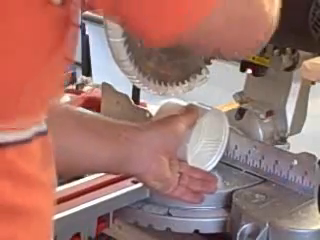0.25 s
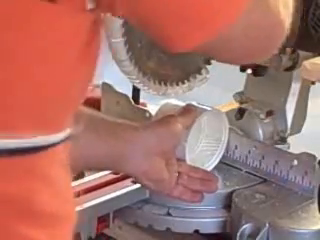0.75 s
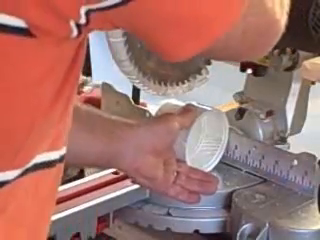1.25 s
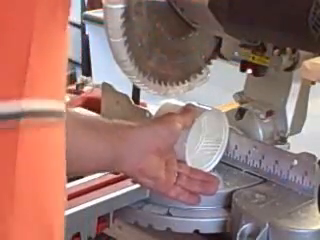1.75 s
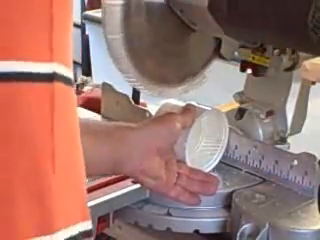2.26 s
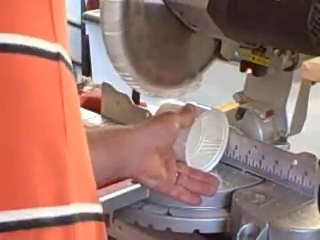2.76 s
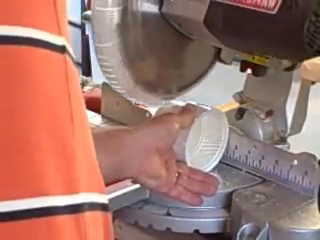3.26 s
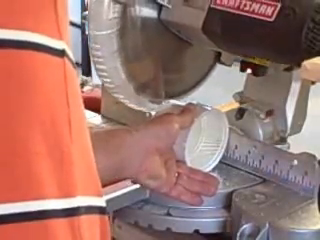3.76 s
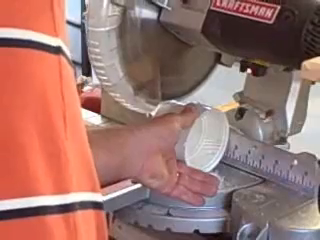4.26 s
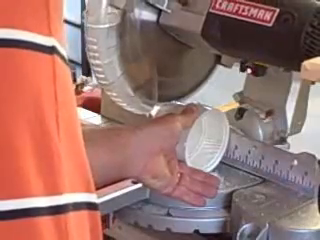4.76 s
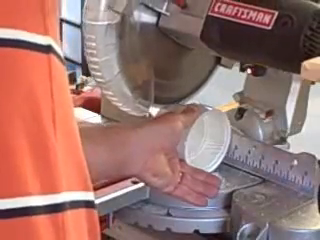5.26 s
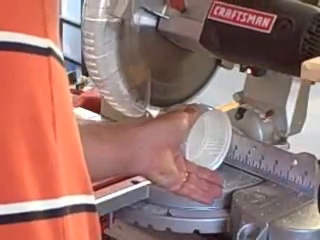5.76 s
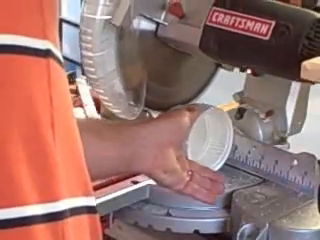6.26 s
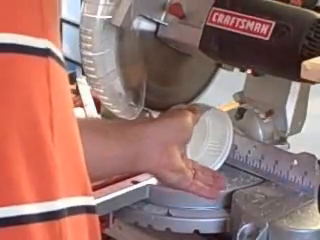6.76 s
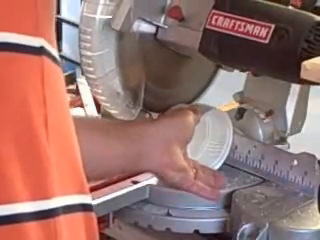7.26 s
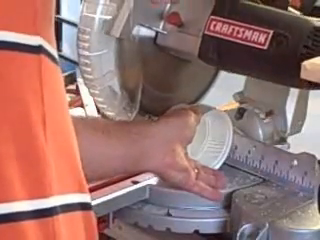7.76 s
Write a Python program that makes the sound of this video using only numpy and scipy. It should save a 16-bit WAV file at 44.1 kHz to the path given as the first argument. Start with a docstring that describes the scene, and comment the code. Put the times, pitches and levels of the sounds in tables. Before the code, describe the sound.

In a quiet workshop a miter saw jerks on, whines up to a roar, then bites plastic pipe with a harsh, ringing screech that keeps going.

```python
"""A mitre saw in a quiet workshop: its motor jerks into life, whines up to speed and bites a plastic pipe.
Motor and cut are random noise, partly repeated every turn of the blade, then coloured and set in level.
Gear and tooth tones are sines locked to the blade angle; the start and first contact are ringing sines.
A sleeve rubs past beforehand. Room hiss and mains hum lie underneath."""
import sys
import numpy as np
from scipy import signal
from scipy.fft import rfft, irfft, next_fast_len
from scipy.io import wavfile
from scipy.ndimage import uniform_filter1d, map_coordinates

SR = 44100
rng = np.random.default_rng(int(sys.argv[2]) if len(sys.argv) > 2 else 0)


def file_out(sig):
    """Save sig as 16-bit WAV at sys.argv[1]."""
    # one column per channel
    cols = np.atleast_2d(sig).T
    # limit, then scale
    lim = np.clip(cols, -1, 1)
    pcm = np.round(lim * 32767).astype(np.int16)
    wavfile.write(sys.argv[1], SR, pcm)


N = 353682  # length in samples

# how fast the blade turns: (time [s], speed [turns/s])
BLADE_SPEED = [(2.05, 10.0), (2.11, 21.0), (2.18, 30.3), (2.3, 43.0), (2.38, 49.6), (2.5, 55.3),
               (2.7, 61.81), (3.0, 67.3), (3.3, 71.22), (3.8, 74.62), (4.1, 74.98), (4.4, 74.4),
               (5.1, 71.04), (5.55, 67.65), (5.8, 66.7), (6.6, 64.6), (7.6, 61.9), (8.02, 60.09)]
# loudness of the motor: (time [s], housing roar [dB], gearbox rattle [dB], cooling air [dB])
MOTOR_LEVELS = [(2.04, -84, -81, -74), (2.05, -35, -31, -42), (2.11, -27.5, -26.5, -31),
                (2.2, -24.5, -26, -34), (2.45, -23, -23.5, -25.5), (2.89, -20, -17.5, -24.5),
                (3.57, -22, -19, -24.5), (3.79, -20.5, -19, -23.5), (3.92, -25, -21.5, -24.5),
                (4.64, -25.5, -23.5, -24), (5.25, -29, -23.5, -21.5), (5.4, -35.5, -27.5, -22.5),
                (5.6, -33.5, -30, -30.5), (6.2, -36, -30.5, -26), (6.62, -36.5, -35.5, -31.5),
                (6.92, -32, -29, -29), (7.2, -33, -28, -21.5), (7.6, -32.5, -30, -23),
                (8.02, -35.5, -29, -27.5)]
# bite of the blade: (time [s], level [dB])
CUT_LEVEL = [(3.77, -23), (3.81, -20), (3.95, -23.5), (4.33, -19), (4.59, -20.5), (4.65, -23), (5.19, -20),
             (5.4, -21), (5.6, -22), (5.68, -19.5), (6.16, -24), (6.45, -24), (6.56, -32.5), (6.87, -23),
             (7.37, -20), (7.65, -21.5), (7.81, -20), (8.02, -20.5)]
# ways the blade plate rings:
# (frequency [Hz], width [Hz], boost over the broad sound of the cut [dB], relative level when struck [dB])
BLADE_MODES = [(1190, 30, 8, -30), (1325, 30, 8, -24), (1800, 30, 6, -30), (2320, 50, 5, -16),
               (2910, 30, 8, -24), (4400, 40, 7, -20), (4570, 30, 9, -14), (4702, 30, 6, -6),
               (5200, 45, 9, -20), (5390, 25, 9, -10), (5500, 30, 8, -20), (5745, 20, 11, 0),
               (5930, 30, 8, -18), (6220, 35, 11, -6), (6330, 30, 9, -9), (6750, 30, 8, -18),
               (6890, 30, 6, -14), (7180, 40, 7, -12), (9390, 40, 5, -16), (10400, 60, 5, -11),
               (11500, 70, 4, -20)]
CUT_START_S = CUT_LEVEL[0][0]


def amp(db):
    """Turn a level in dB into a gain."""
    return 10 ** (np.asarray(db) / 20)


def unit(x):
    """Scale x to an rms of 1."""
    return x / np.sqrt(np.mean(x ** 2) + 1e-20)


def curves(rows, levels=True):
    """One value per sample for each column after the time; outside the table -150 dB, or 0 if not levels."""
    times, *columns = np.transpose(rows)
    edge = -150 if levels else 0
    t = np.arange(N) / SR
    return [np.interp(t, times, column, edge, edge) for column in columns]


def noise():
    """White noise."""
    return rng.standard_normal(N)


def wobble(rate):
    """A smooth random curve through `rate` random points a second."""
    points = rng.standard_normal(int(N * rate / SR) + 4)
    return map_coordinates(points, [np.arange(N) * rate / SR])


def filtered(x, response):
    """Filter x with a gain given as a function of frequency in Hz."""
    size = next_fast_len(N + SR // 2)
    spectrum = rfft(x, size) * response(np.fft.rfftfreq(size, 1 / SR))
    return irfft(spectrum, size)[..., :N]


def coloured(x, points):
    """Shape x by (frequency [Hz], relative level [dB]) points on a log axis, then scale to rms 1."""
    freqs, levels = np.transpose(points)

    def response(hz):
        return amp(np.interp(np.log(hz + 1), np.log(freqs + 1), levels))

    return unit(filtered(x, response))


def patchy(x, patchy_db):
    """Make patches of x louder or softer at random, in time and in frequency."""
    spectrum = signal.stft(x, nperseg=512)[2]
    field = uniform_filter1d(rng.standard_normal(spectrum.shape), 5, 0)  # smooth over frequency
    field = uniform_filter1d(field, 20, 1)  # smooth over time
    return signal.istft(spectrum * amp(patchy_db * unit(field)), nperseg=512)[1][:N]


def tone(cycles, level_db, blur):
    """A sine with its rms at level_db; its phase wanders by about `blur` radians."""
    return np.sqrt(2) * amp(level_db) * np.sin(2 * np.pi * cycles + blur * wobble(70))


def turns():
    """Blade angle: adding up the speed gives the turns since the start."""
    return np.cumsum(curves(BLADE_SPEED, levels=False)[0]) / SR


def repeating(angle, memory, size=400):
    """A random force that nearly repeats each turn, changing over `memory` turns: lines at every order."""
    rows = rng.standard_normal((int(angle[-1]) + 2, size))  # one row per turn
    rows = uniform_filter1d(rows, max(1, round(memory)), 0)
    fine = signal.resample(rows.ravel(), 4 * rows.size)
    return unit(np.interp(angle * 4 * size, np.arange(len(fine)), fine))


def order_db(order, steady_db):
    """Level of one order (tones per blade turn): steady, plus swells as it slides through a resonance."""
    # swells: (time of peak [s], order [tones/turn], peak level [dB], half length [s])
    swells = [(2.198, 76, -36, 0.029), (2.4, 76, -30, .05), (2.497, 152, -37, .06), (2.46, 228, -38, .04),
              (2.57, 38, -28, .07), (3.36, 37, -30, 0.1), (3.79, 37, -24.5, 0.075), (4.46, 37, -32.5, 0.33),
              (5.796, 38, -36.5, 0.15), (7.2, 38, -46, 0.12), (4.604, 18, -28.5, 0.23),
              (5.353, 18, -35.5, 0.18), (6.22, 18, -33, .16), (3.834, 60, -21, 0.046),
              (4.45, 60, -32, 0.11), (5, 60, -29.5, 0.22), (5.25, 60, -29.5, 0.088), (5.4, 60, -15, .09),
              (5.53, 60, -17, .08), (5.96, 60, -20, 0.15), (6.218, 60, -23.5, .08), (6.424, 60, -27, 0.13),
              (6.6, 60, -34, 0.059), (6.856, 60, -37, .07), (7.16, 60, -26, .11), (7.38, 60, -36, 0.087),
              (7.588, 60, -32, 0.072), (7.793, 60, -28.5, 0.077), (4.752, 90, -29.5, 0.25),
              (5.212, 90, -22.5, 0.14), (5.57, 90, -30, .1), (6.4, 90, -30, 0.072), (7.35, 90, -30, 0.32),
              (7.79, 90, -24, .07), (5.35, 120, -32, 0.17), (6.003, 120, -36, 0.28), (6.9, 120, -30, 0.063),
              (7.8, 120, -39, .12), (8.0, 86, -24, .06), (5.268, 36, -29, 0.21), (6.8, 36, -34.5, 0.057),
              (7.25, 36, -35.5, .12), (3.8, 30, -30, 0.12), (4.329, 30, -35, 0.093), (5.2, 30, -34.5, 0.13),
              (8.0, 30, -31.5, 0.098), (5.92, 27, -34, .07), (7.85, 22, -34, 0.18), (7.12, 46, -33.5, 0.13),
              (5.1, 35, -31.5, 0.2), (7.3, 70, -27, .08), (5.25, 17, -35.5, 0.094),
              (4.31, 72, -34.5, 0.066), (6.3, 72, -34, 0.083), (7.1, 72, -29, 0.15), (7.47, 72, -26, .08),
              (7.37, 73, -26, .06)]
    fall_db = 7.5  # lost one half length away from the peak
    t = np.arange(0, N / SR + .01, .005)  # a coarse time grid is enough
    added = sum(amp(db - fall_db * ((t - s) / half) ** 2)
                for s, k, db, half in swells if k == order)
    added = np.interp(np.arange(N) / SR, t, added + 0 * t)  # 0 * t: works with no swells too
    return 20 * np.log10(amp(steady_db) + added)


def shop():
    """The quiet room: patchy coloured hiss, and a mains hum of sines that waver in level and phase."""
    # colour of the hiss: (frequency [Hz], relative level [dB])
    hiss_colour = [(12, -33), (20, 3), (53, -3.5), (122, -5), (246, -11.5), (297, -10.5), (687, -14.5),
                   (765, -14), (899, -14), (975, -19), (12700, -39), (16500, -73), (22000, -120)]
    # mains hum: (frequency [Hz], level [dB])
    mains_tones = [(59.2, -67.5), (118.4, -64.5), (177.6, -79)]
    hiss_db = -62
    t = np.arange(N) / SR
    mains = sum(tone(hz * t, db + 2.5 * wobble(16), blur=0.4) for hz, db in mains_tones)
    return amp(hiss_db) * coloured(patchy(noise(), patchy_db=2.0), hiss_colour) + mains


def sleeve():
    """Cloth rubs briefly: dense noise made slightly grainy by fast changes of level."""
    # how loud the rub is: (time [s], level [dB])
    rub_level = [(0.66, -83), (0.675, -56), (0.712, -54), (0.72, -49), (0.76, -45.5), (0.81, -50),
                 (1.05, -83)]
    # colour of the cloth: (frequency [Hz], relative level [dB])
    cloth_colour = [(180, -49), (300, -15), (465, -13), (544, -15), (768, -6.5), (1960, -10), (2190, -5.5),
                    (4800, -17), (12700, -29), (16500, -56), (22000, -120)]
    grainy = noise() * amp(2.0 * wobble(500))
    return amp(curves(rub_level)[0]) * coloured(grainy, cloth_colour)


def motor(angle):
    """Shaking, partly repeated each turn, makes the housing roar and the gears rattle; the air is noise."""
    # colours of the housing, gearbox and cooling air: (frequency [Hz], relative level [dB])
    housing_colour = [(190, -24.5), (320, -14), (340, -2.5), (473, -4.5), (531, 0.5), (638, 0.5),
                      (815, -0.5), (1300, -2.5), (1480, -7), (2000, -10.5), (2600, -44), (4400, -120)]
    gearbox_colour = [(880, -44), (1500, -16.5), (1890, -19.5), (2140, -3.5), (2720, -2.5), (2890, -3.5),
                      (5240, -8.5), (6500, -14), (8450, -17), (14300, -120)]
    air_colour = [(2940, -12.5), (5000, -3), (7290, -6.5), (8530, -5.5), (11000, -5.5), (11800, -12.5),
                  (12200, -73), (15900, -57), (22000, -120)]
    roar_db, rattle_db, air_db = curves(MOTOR_LEVELS)
    # under load the shaking repeats far more exactly from turn to turn
    locked = .4 + .4 * (np.arange(N) > CUT_START_S * SR)
    shake = (noise() + locked * repeating(angle, memory=12)) / np.hypot(1, locked)
    roar = amp(roar_db) * coloured(patchy(shake, patchy_db=1.22), housing_colour)
    rattle = amp(rattle_db) * coloured(patchy(shake, patchy_db=0.6), gearbox_colour)
    air = amp(air_db) * coloured(patchy(noise(), patchy_db=1.26), air_colour)
    return roar + rattle + air


def high_hiss():
    """A narrow band of high hiss that swells during the spin-up: noise kept only at the top."""
    # how loud the high hiss is: (time [s], level [dB])
    hiss_level = [(2.04, -77), (2.048, -55), (2.076, -39), (2.52, -30), (2.62, -45)]
    hiss = coloured(noise(), [(10500, -60), (11700, -3), (13000, -2)])
    return amp(curves(hiss_level)[0]) * hiss


def bench_rumble():
    """Rumble passed through the bench: low noise with a changing level."""
    # how loud the rumble is: (time [s], level [dB])
    rumble_level = [(2.04, -57), (2.26, -44.5), (2.64, -52.5), (3.72, -41), (4.1, -52), (5.02, -51),
                    (5.69, -44), (6.14, -52), (7.27, -51), (8.02, -42)]
    # colour of the bench: (frequency [Hz], relative level [dB])
    bench_colour = [(15, 6), (30, -15), (120, -0.5), (280, 2.5), (400, -20), (600, -120)]
    return amp(curves(rumble_level)[0]) * coloured(noise(), bench_colour)


def start():
    """The gears take up their slack in a few knocks, each ringing the casting as fading sines."""
    # knocks of the gears: (time [s], strength [dB])
    knocks = [(2.051, -26), (2.057, -16.5), (2.070, -15), (2.084, -16), (2.094, -17), (2.113, -16),
              (2.128, -14.5), (2.141, -19.5), (2.149, -15.5), (2.160, -20), (2.181, -21), (2.194, -24),
              (2.208, -23)]
    # ringing of the casting: (frequency [Hz], relative level [dB], time to fall 60 dB [s])
    casting_modes = [(143, -17, 0.12), (711, 4.5, 0.043), (795, 11, 0.039), (850, -4, .03),
                     (2530, -14, 0.023), (4130, -3.5, 0.04), (10200, -27, .05)]
    out, t = np.zeros(N + SR), np.arange(SR // 4) / SR
    for s, db in knocks:
        ring = sum(amp(level + rng.normal(0, 1.5) - 60 * t / t60) * np.sin(2 * np.pi * hz * t)
                   for hz, level, t60 in casting_modes)
        attack = 1 - np.exp(-t / 0.0035)
        out[round(s * SR):][:len(t)] += amp(db) * ring * attack
    return out[:N]


def gear(angle):
    """The 38-tooth gear whines unevenly, one cycle per tooth, with overtones while it speeds up hard."""
    # overtones of the whine: (multiple of the tooth rate [x], level before fades and swells [dB])
    overtone_levels = [(2, -36), (4, -50), (6, -54)]
    t, count = np.arange(N) / SR, 38
    mesh_over_rattle_db, beside_over_mesh_db = -9, -10
    # by this time the tone has climbed into the range of the gearbox
    mesh_s, mesh_rise_db_per_s = 2.45, 70
    whine_s, whine_end_s, whine_fade_db_per_s = 2.15, 2.75, 60
    mesh_db = curves(MOTOR_LEVELS)[1] + mesh_over_rattle_db
    mesh_db = mesh_db - mesh_rise_db_per_s * np.maximum(mesh_s - t, 0)
    # phase wander in radians: loose gears chatter, the cut presses them together
    blur = np.where(t < CUT_START_S, 1.7, .5)
    # the mesh tone and a weaker one an order below
    steady = sum(tone(k * angle, order_db(k, level) + 3 * wobble(90) + 2.5 * wobble(12), blur=blur)
                 for k, level in ((count, mesh_db), (count - 1, mesh_db + beside_over_mesh_db)))
    # the overtones come in five times as steeply as they fade out
    fade_s = np.maximum(t - whine_end_s, 0) + 5 * np.maximum(whine_s - t, 0)
    fade_db = -whine_fade_db_per_s * fade_s
    whine = sum(tone(k * count * angle, order_db(k * count, level + fade_db) + 2.5 * wobble(160), blur=1.6)
                for k, level in overtone_levels)
    return steady + whine


def hum():
    """A low hum, one cycle per turn of the motor armature, that later slides down in pitch."""
    # how loud the hum is: (time [s], level [dB])
    hum_level = [(3.0, -64), (3.4, -31), (3.6, -30.5), (4.1, -38), (5.0, -38.5), (5.2, -48), (5.4, -34.5),
                 (5.75, -47), (5.96, -39), (6.3, -44), (6.6, -57)]
    motor_turns_per_blade_turn = 38 / 8
    slide_s, slide_tau_s, slide_aim_hz = 5.2, .65, -30  # the pitch heads for the aim but stops at 0 Hz
    t = np.arange(N) / SR
    hz = motor_turns_per_blade_turn * curves(BLADE_SPEED, levels=False)[0]
    held = np.where(t < slide_s, hz, hz[round(slide_s * SR)])
    remaining = np.exp(-np.maximum(t - slide_s, 0) / slide_tau_s)
    pitch = np.maximum(held * remaining + slide_aim_hz * (1 - remaining), 0)
    return tone(np.cumsum(pitch) / SR, curves(hum_level)[0], blur=0.097)


def cut(angle):
    """Uneven teeth repeat their blows each turn and ring the blade; tones at its orders swell and fade."""
    # broad colour of the cut: (frequency [Hz], relative level [dB])
    chip_colour = [(240, -60), (400, -16), (1100, -11), (1960, -12), (2760, -12.5), (4000, -5),
                   (5320, -1.5), (7830, -5.5), (11400, -7.5), (11900, -0.5), (12200, -60), (13000, -120)]
    # tones between swells, the tooth tone last: (order [tones/turn], level [dB])
    steady_levels = [(120, -47.5), (36, -46), (90, -56), (30, -49), (72, -43), (18, -49), (17, -51),
                     (22, -50.5), (27, -50.5), (35, -48.5), (46, -47.5), (70, -47), (73, -45), (86, -45),
                     (60, -38)]

    def modes(f):
        """The direct blow plus one resonance for each blade mode."""
        return 1 + sum(amp(db) * 1j * f * width / (centre * centre - f * f + 1j * f * width)
                       for centre, width, db, _ in BLADE_MODES)

    blows = patchy(repeating(angle, memory=16) + .5 * noise(), patchy_db=2.2)
    body = amp(curves(CUT_LEVEL)[0]) * coloured(filtered(blows, modes), chip_colour)
    *others, (count, steady_db) = steady_levels
    lines = sum(tone(k * angle, order_db(k, db) + 2.5 * wobble(11), blur=0.48) for k, db in others)
    tooth_db = order_db(count, steady_db)
    tooth = tone(count * angle, tooth_db + 3 * wobble(28), blur=0.25)
    # the blade runs out of true, so the tooth tone carries a neighbour on each side:
    # (distance in orders, dB below the tooth tone)
    neighbours = ((-1, 18.4), (0.98, 11.0))
    beside = sum(tone((count + k) * angle, tooth_db - db + 4.7 * wobble(5.7), blur=0.98)
                 for k, db in neighbours)
    return body + (lines + tooth + beside) * (np.arange(N) > CUT_START_S * SR)


def touch():
    """The first teeth strike the pipe and the blade plate rings: fading sines at its modes."""
    # strikes: (time [s], strength [dB], time to fall 60 dB [s])
    strikes = [(3.78, -13, 0.27), (3.803, -13, 0.49)]
    out, t = np.zeros(N + SR), np.arange(SR // 2) / SR
    for s, db, t60 in strikes:
        ring = sum(amp(level) * np.sin(2 * np.pi * (hz * t + rng.random()))
                   for hz, _, _, level in BLADE_MODES)
        attack = 1 - np.exp(-t / 0.007)
        out[round(s * SR):][:len(t)] += amp(db - 60 * t / t60) * ring * attack
    return out[:N]


def scene():
    """All sources added together at one microphone."""
    angle = turns()
    background = shop() + sleeve()
    machine = motor(angle) + high_hiss() + bench_rumble() + start() + gear(angle) + hum()
    return (background + machine + cut(angle) + touch())[None]


def record(dry):
    """Round off the highest peaks smoothly, then remove everything from the top frequency up."""
    ceiling, top_hz = .65, 12823
    soft = dry / (1 + np.abs(dry / ceiling) ** 4) ** (1 / 4)
    return filtered(soft, lambda hz: hz < top_hz)


dry = scene()
out = record(dry)
file_out(out)
```